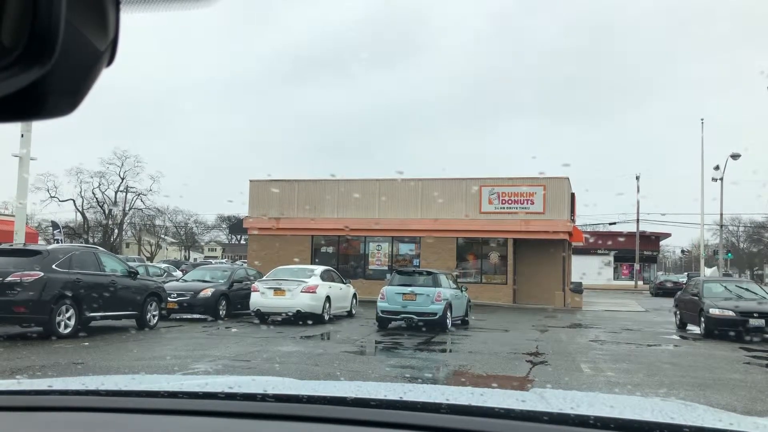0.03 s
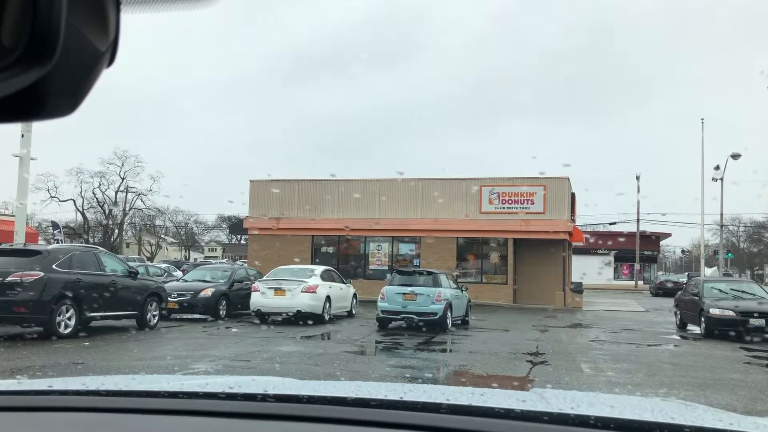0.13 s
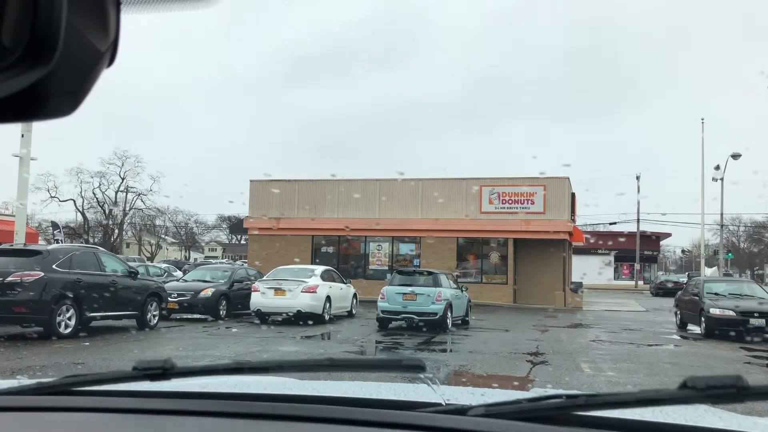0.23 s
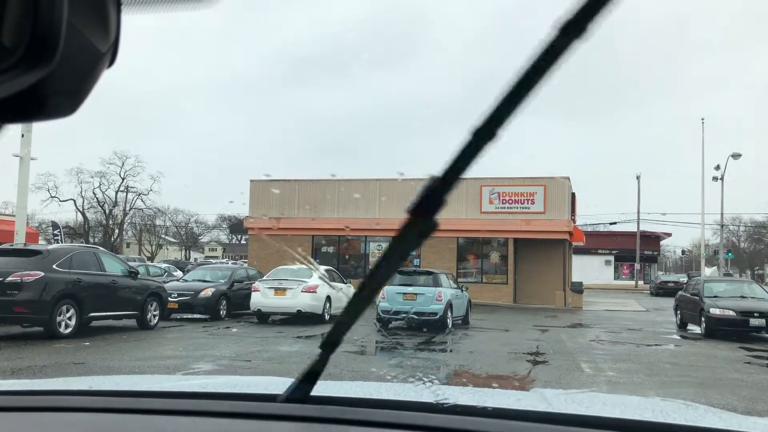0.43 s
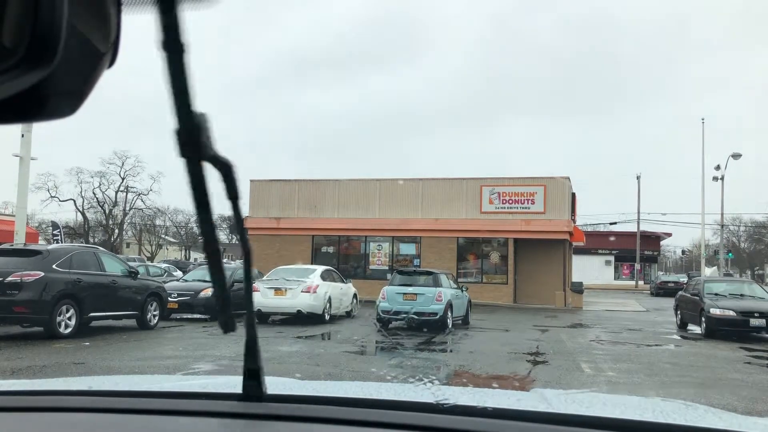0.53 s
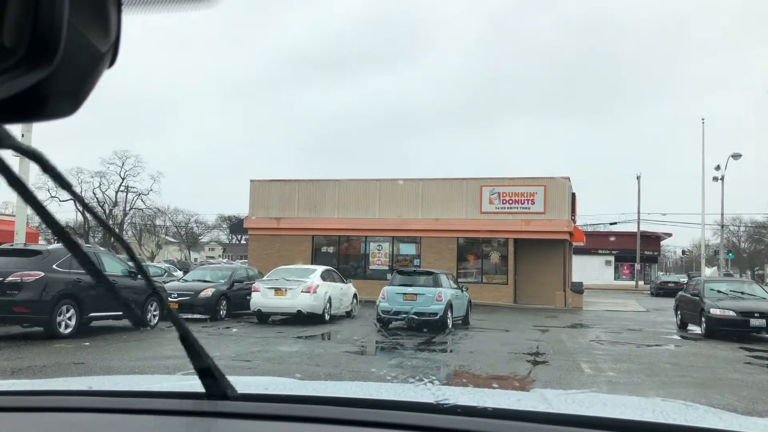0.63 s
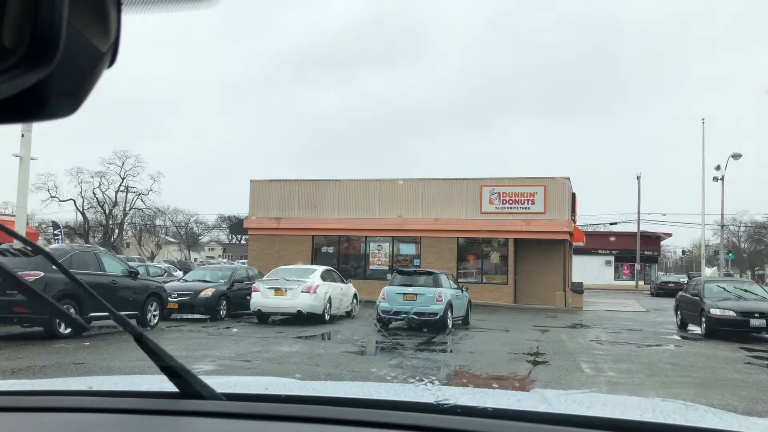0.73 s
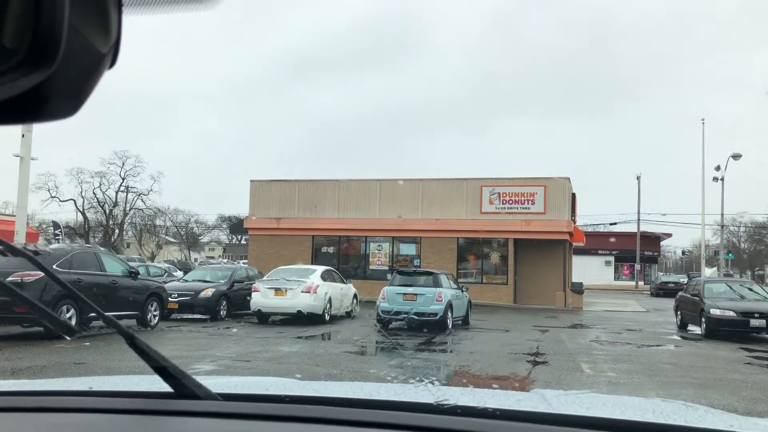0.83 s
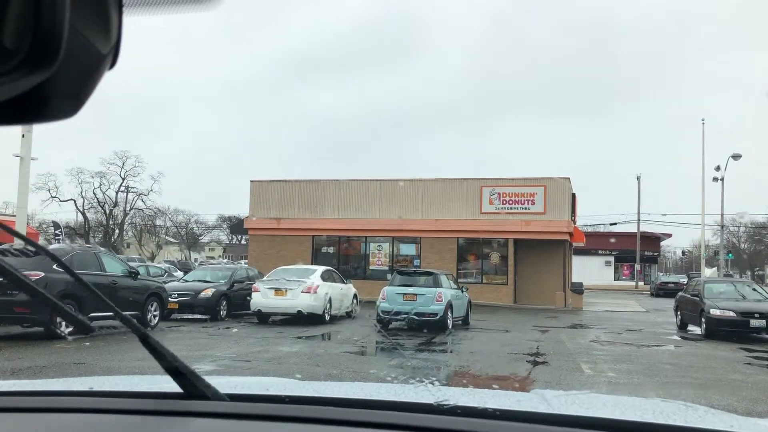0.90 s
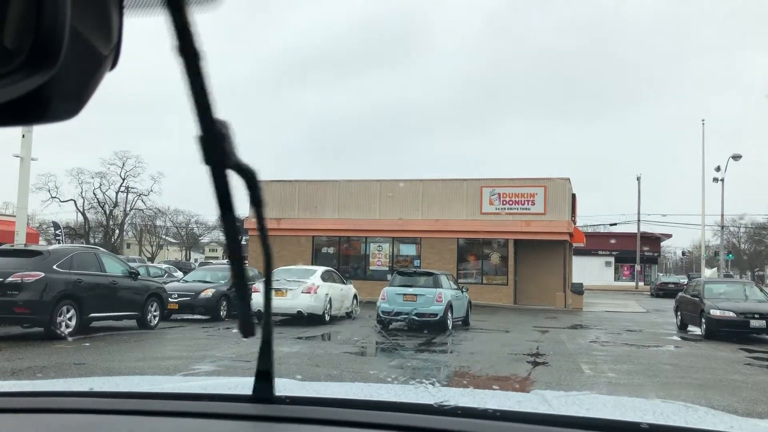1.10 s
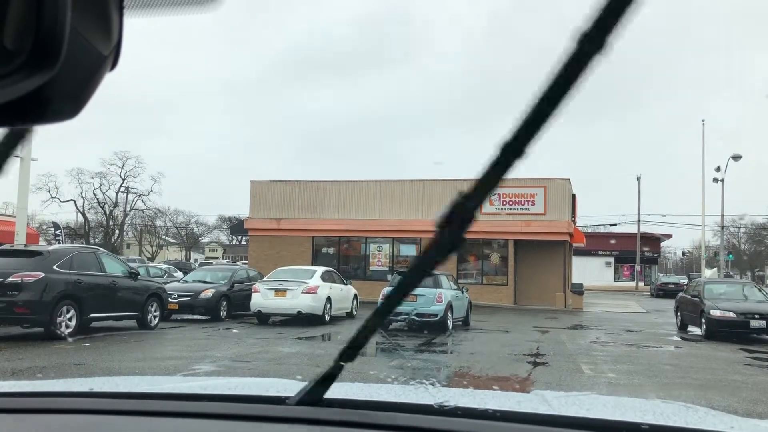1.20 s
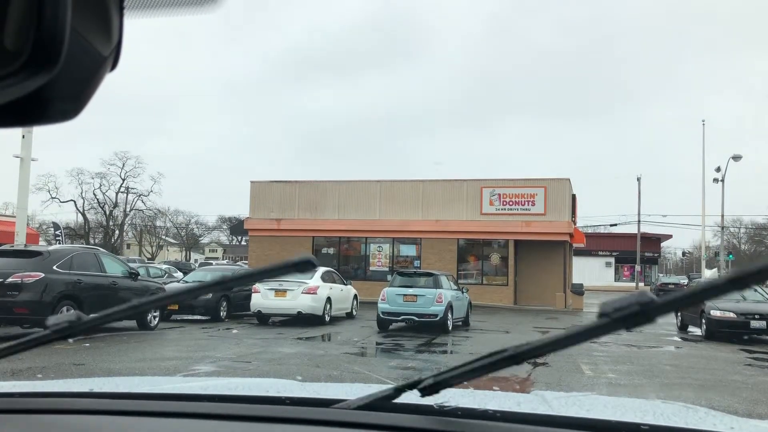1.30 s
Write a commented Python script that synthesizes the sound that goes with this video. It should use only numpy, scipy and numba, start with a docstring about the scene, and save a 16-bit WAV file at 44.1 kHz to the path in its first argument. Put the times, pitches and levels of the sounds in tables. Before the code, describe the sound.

Windshield wipers sweep once over wet glass, heard inside a car with a low idling engine. At about 0.2 seconds the wiper motor hums, the rubber snaps and the arms knock and thump. From 0.4 to 0.85 seconds the blades judder, a buzz with a falling ring. The arms clatter and thump at the turn until 1 second, then glide back quietly with a brief rub and last ticks around 1.2 seconds.

```python
"""Windshield wipers make one sweep over wet glass, heard inside an idling car.
Over the engine's low throb the wiper motor starts to hum, the wet rubber snaps, and the arms
knock in their joints and flex. On the way up the blades stick and slip about 100 times a second,
a buzzing judder with a falling ring. At the turn the arms clatter and thump, then the blades
glide back almost silently, with a brief humming rub and a few last ticks."""
import sys
import numpy as np
from scipy import signal
from scipy.fft import rfft, irfft
from scipy.io import wavfile
from scipy.ndimage import uniform_filter1d
from numba import njit

SR = 44100
rng = np.random.default_rng(int(sys.argv[2]) if len(sys.argv) > 2 else 0)


def dump_mix(stems):
    """Bounce the given channels to the path in sys.argv[1] as a 16-bit WAV at rate SR."""
    frames = np.atleast_2d(stems).T  # one column per channel
    limited = np.clip(frames, -1, 1)  # hard clip at full scale
    pcm = np.round(limited * 32767).astype(np.int16)
    wavfile.write(sys.argv[1], SR, pcm)


N = 59535
T = np.arange(N) / SR
# bright colour of water fizz and joint clicks (frequency [Hz], relative level [dB])
TICK_COLOUR = [(300, -41.5), (1200, 13.5), (2500, 3.5), (4000, 5), (6500, -2.5), (8500, -13.5),
               (11000, -19.5), (16000, -37.5)]


def amp(db):
    """Decibels to gain."""
    return 10 ** (np.asarray(db) / 20)


def unit(x):
    """Scales to rms 1."""
    return x / np.sqrt(np.mean(x ** 2) + 1e-20)


def add(mix, start_s, sound):
    """Mixes a sound in at a time."""
    part = mix[max(round(start_s * SR), 0):][:len(sound)]
    part += sound[:len(part)]


def colour(x, spectrum, size=8192):
    """Causal EQ of unit energy with the given spectrum."""
    points_hz, db = np.transpose(spectrum)
    hz = abs(np.fft.fftfreq(size, 1 / SR))
    log_gain = np.log(amp(np.interp(np.log(hz + 1), np.log(points_hz + 1), db)))
    minimum_phase = np.exp(np.conj(signal.hilbert(log_gain)))
    taps = np.fft.ifft(minimum_phase).real[:size // 2]
    return signal.fftconvolve(x, taps / np.linalg.norm(taps))[:len(x)]


def noise(spectrum, preroll=4096):
    """Steady coloured noise of rms 1."""
    return unit(colour(rng.standard_normal(N + preroll), spectrum)[preroll:])


def drift(hz):
    """Random wander of rms 1, mostly slower than hz."""
    f = np.fft.rfftfreq(N, 1 / SR)
    return unit(irfft(rfft(rng.standard_normal(N)) * np.exp(-(f / hz) ** 2), N))


def cycles(hz, waver, waver_hz):
    """Running cycle count of a wavering pitch."""
    return np.cumsum(hz * (1 + waver * drift(waver_hz))) / SR


def tone(turns, db):
    """A sine at an rms level, following a cycle count."""
    return np.sqrt(2) * amp(db) * np.sin(2 * np.pi * turns)


def decay(t60):
    """Envelope that falls 60 dB in t60 seconds."""
    return np.exp(-np.log(1000) * T / t60)


def burst(t60, size=14000):
    """A dying puff of noise with the energy of its envelope."""
    shape = decay(t60)[:size]
    return unit(rng.standard_normal(size) * shape) * np.sqrt(np.mean(shape ** 2))


def ringing(modes):
    """A struck object's dying modes."""
    return sum(amp(db) * decay(t60) * np.sin(2 * np.pi * hz * T) for hz, db, t60 in modes)


@njit
def smooth(x, keep):
    """One-pole low-pass whose speed may change."""
    y = x.copy()
    for i in range(1, len(x)):
        y[i] += keep[i] * (y[i - 1] - x[i])
    return y


def resonate(x, hz, width_hz):
    """A resonance of gain 1 that follows curves of pitch and width."""
    carrier = np.exp(2j * np.pi * np.cumsum(hz) / SR)
    return 2 * (carrier * smooth(x / carrier, np.exp(-np.pi * abs(width_hz) / SR))).real


def low_cut(x, hz):
    """Small parts radiate little bass."""
    return signal.lfilter(*signal.butter(2, hz, "highpass", fs=SR), x)


def roughen(clean, rough, share):
    """Blends two sounds by power."""
    return np.sqrt(1 - share) * unit(clean) + np.sqrt(share) * unit(rough)


def curves(table):
    """Each column of a table joined by straight lines in time."""
    times, *columns = np.transpose(table)
    return [np.interp(T, times, column) for column in columns]


def idle():
    """Wavering engine orders throb under the steady air of the cabin."""
    # engine orders (pitch [Hz], rms level [dB])
    orders = [(37.5, -50), (112, -64.5)]
    # dark cabin air (frequency [Hz], relative level [dB])
    cabin_colour = [(15, -22.5), (28, -5), (42, -2), (55, -0.5), (75, 1.5), (130, 2), (220, -8), (330, -12),
                    (500, -15.5), (900, -17.5), (1250, -19.5), (1600, -24.5), (2500, -29.5), (4000, -30.5),
                    (8000, -42), (16000, -54)]
    throb = np.zeros(N)
    for hz, db in orders:
        swaying_db = db + 2.5 * drift(6)
        throb += tone(cycles(hz, waver=.04, waver_hz=12), swaying_db)
    return throb + amp(-47.5) * noise(cabin_colour)


def motor():
    """The wiper motor hums under load while the blades swish over the glass."""
    # fader moves (time [s], hum level [dB], swish level [dB])
    faders = [(0, -62, -54), (.12, -75, -71), (.19, -43.5, -51), (.4, -38.5, -41.5), (.92, -37, -57.5),
              (1.03, -38, -47), (1.13, -52.5, -52.5), (1.25, -49.5, -57.5), (1.35, -49.5, -64)]
    # rubber gliding on glass (frequency [Hz], relative level [dB])
    swish_colour = [(100, 1), (330, 10), (600, -8.5), (1200, -20), (2200, -45), (4500, -32), (8000, -38),
                    (16000, -63)]
    hum_db, swish_db = curves(faders)
    turns = cycles(hz=117.37, waver=.0637, waver_hz=24.5)
    hum = tone(turns, hum_db + 5 * drift(33))
    return hum + amp(swish_db) * noise(swish_colour)


def snaps():
    """The wet rubber edge snaps: a bright tick, a slap on the glass and a faint cabin tail."""
    # snaps of the edge (time [s], level [dB])
    cues = [(0.1813, -47), (.2174, -44), (0.3005, -37), (.315, -36.5), (.41, -40.5), (0.485, -44.5),
            (0.5722, -45), (.630, -37.5), (.641, -42), (.652, -37), (0.709, -37.5), (.7208, -37),
            (.7596, -39.5), (0.779, -39), (1.2487, -40)]
    # their crisp top end (frequency [Hz], relative level [dB])
    snap_colour = [(300, -34.5), (1200, 4), (2500, -2), (4000, 1.5), (6500, 0), (8500, -11), (11000, -23),
                   (16000, -27)]
    ticks, slaps = np.zeros((2, N))
    for start, db in cues:
        tick = burst(t60=.0024)
        tail = amp(-18) * burst(t60=.073)
        add(ticks, start, amp(db) * (tick + tail))
        add(slaps, start, amp(db + 4) * burst(t60=.026))
    glass = resonate(slaps, hz=np.full(N, 1230), width_hz=np.full(N, 350))
    return colour(ticks, snap_colour) + glass


def knocks(size=14000):
    """Play in the joints: each knock rings the arm, rattles the blade frame on the glass and clicks."""
    # linkage knocks (time [s], arm ring [dB], clatter [dB], click [dB], clatter low-pass [Hz])
    cues = [(0.2124, -29, -36, -48.5, 4040), (0.2171, -23.5, -42.5, -39.5, 6000),
            (0.2216, -30, -39.5, -48.5, 4000), (0.2512, -35, -38, -49, 5970), (.276, -23, -37.5, -57, 1040),
            (0.3004, -24, -31, -42.5, 3980), (.3148, -32, -34.5, -46, 3870),
            (0.323, -24.5, -41, -46.5, 2000), (.388, -48, -45, -58.5, 1240),
            (0.4103, -30.5, -45, -55, 2000), (0.8454, -43, -29.5, -49, 4998),
            (.8484, -26.5, -33.5, -49, 3000), (.859, -33, -34, -46, 3000), (0.8607, -60, -40.5, -49, 3050),
            (.877, -28.5, -32.5, -48, 1470), (.953, -56, -39.5, -59, 800), (.962, -31, -42.5, -63, 500),
            (1.0103, -54, -50.5, -52, 6000), (1.015, -56, -46, -50, 5720), (1.096, -49, -47, -80, 610),
            (1.219, -44.5, -44, -51.5, 4040), (1.2206, -54, -48, -60, 4000)]
    # low ring of the arm (pitch [Hz], relative level [dB], t60 [s])
    arm_modes = [(94.4, -1, 0.072), (149.1, 5, 0.2), (178.5, 6, 0.076), (222.4, 1.5, 0.099),
                 (254.7, 3, 0.084), (332.4, -2, .13), (411.5, -12, 0.065)]
    # higher ring of the blade frame (pitch [Hz], relative level [dB], t60 [s])
    frame_modes = [(634, -7, 0.073), (1117, -8, 0.076), (1287, -13, 0.041), (1545, -13.5, 0.051),
                   (1690, -23, .05)]
    # blade clatter (frequency [Hz], relative level [dB])
    clatter_colour = [(100, -11.5), (250, 6.5), (420, 12.5), (500, 6), (620, 3.5), (780, 3.5), (950, -0.5),
                      (1130, -6.5), (1350, -4), (1650, -11.5), (2100, -23), (4000, -21), (16000, -74)]
    attack_s = .004
    arm = (1 - np.exp(-T / attack_s)) * ringing(arm_modes)
    frame = ringing(frame_modes)
    body, clicks = np.zeros((2, N))
    for start, ring_db, clatter_db, click_db, top_hz in cues:
        clatter = colour(burst(t60=.092), clatter_colour) + frame[:size]
        clatter = signal.lfilter(*signal.butter(2, top_hz, fs=SR), clatter)
        add(body, start, amp(ring_db) * arm[:size] + amp(clatter_db) * clatter)
        add(clicks, start, amp(click_db) * burst(t60=.038))
    return low_cut(body, hz=75) + colour(clicks, TICK_COLOUR)


def thumps_and_rub():
    """Low thumps of the flexing arms, and a brief humming rub of the blade on the way back."""
    # arm thumps, then the blade's rub in the last row
    # (time [s], pitch [Hz], level [dB], attack [s], t60 [s])
    cues = [(0.22, 99.7, -27, 0.021, 0.18), (0.289, 143.8, -13, .035, 0.14),
            (.292, 254, -28.5, 0.035, 0.056), (.845, 129.2, -21.5, 0.058, 0.075),
            (0.847, 81.5, -23.5, 0.05, .06), (0.967, 84.5, -23.5, 0.0143, 0.34),
            (0.964, 53.7, -25.5, 0.0054, 0.35), (0.974, 119.5, -26.5, 0.0033, 0.13),
            (1.085, 338.3, -39.5, 0.0083, 0.32)]
    mix = np.zeros(N)
    for start, hz, db, attack_s, t60 in cues:
        swell = np.minimum(T / attack_s, 1)
        release = np.exp(-np.log(1000) * np.maximum(T - attack_s, 0) / t60)
        add(mix, start, amp(db) * swell * release * np.sin(2 * np.pi * hz * T))
    return mix


def rubber_lip(slips, turns, scatter):
    """Each slip rings the rubber lip; past the upright, strong and weak kicks alternate."""
    # ring of the lip (time [s], pitch [Hz], first-stage width [Hz], level [dB], roughness [0-1])
    moves = [(.385, 680, 395, -47.5, 0.56), (.43, 584, 243, -44.5, 0.2), (.475, 583, 161, -31.5, 0),
             (.52, 483, 100, -49.5, 0.1), (.565, 406.5, 51.5, -35.5, 0.02), (.61, 367, 43.2, -39.5, 0.08),
             (.665, 401, 111.4, -31, 0.33), (.72, 353, 49.3, -30.5, 0), (.76, 347, 50, -30.5, .15),
             (.80, 343, 50.6, -34, 0), (.842, 345, 59.3, -30, 0.1)]
    hz, width_hz, db, roughness = curves(moves)
    limp_depth, upright_s = .93, .56
    limping = slips * (1 + limp_depth * (T > upright_s) * (-1) ** np.floor(turns))
    ring = roughen(limping, scatter, roughness)
    for widening in (1, 2, 2):
        ring = resonate(ring, hz, widening * width_hz)
    running_rms = np.sqrt(abs(uniform_filter1d(ring ** 2, size=2200)) + 1e-12)
    return low_cut(amp(db) * ring / running_rms, hz=193)


def judder():
    """The blade sticks and slips: once a cycle it swings, rings its lip, slaps the glass and sprays."""
    # stick-slip, levels before trims (time [s], slip rate [Hz], harmonics 1-4 [dB each],
    # glass slap [dB], water fizz [dB])
    moves = [(.385,94.5,-33,-40,-40.5,-56,-46.5,-61.5), (.412,107,-32.5,-37.5,-43.5,-71,-43.5,-74),
             (.44,108.5,-23,-28.5,-49.5,-38,-40,-57.5), (.472,115,-30.5,-26,-36,-36,-49.5,-71),
             (.502,102.7,-21,-38,-38,-35,-42,-59), (.53,97,-22.5,-34,-49,-48,-47.5,-59.5),
             (.562,98.4,-27.5,-43,-54,-30,-41.5,-62), (.605,90,-32,-40.5,-39,-29,-44.5,-78),
             (.64,95.7,-25,-35.5,-53.5,-38,-40,-69), (.668,101.8,-27,-37,-43,-23,-39,-58),
             (.69,103,-26.5,-44,-28,-48,-43,-62.5), (.718,107.4,-19,-36.5,-25.5,-28,-37,-60),
             (.765,101.3,-20.5,-31,-29,-34.5,-39.5,-54), (.805,104.5,-22.5,-46.5,-36,-34,-41,-89),
             (.842,109.7,-24.5,-31,-29,-48,-41,-55)]
    # harmonics 1-4 of the swing (trim [dB])
    trims = [0, 0, -1, -1]
    slap_trim_db, fizz_trim_db, slip_spread_db = 1.5, .5, 3
    fade_s, slap_t60, fizz_decay_cycles = .019, .055, .48
    slip_hz, *harmonics, slap_db, fizz_db = curves(moves)
    turns = cycles(slip_hz, waver=.008, waver_hz=90)
    swing = np.zeros(N)
    for k, db in enumerate(harmonics):
        flutter_db = .5 * k * drift(71)  # higher harmonics flutter more
        swing += tone((k + 1) * turns, db + trims[k] + flutter_db)

    slips = np.diff(np.floor(turns), prepend=0)  # one impulse a cycle
    slips *= amp(slip_spread_db * rng.standard_normal(N))
    scatter = signal.fftconvolve(slips, decay(slap_t60))[:N] * rng.standard_normal(N)
    lip = rubber_lip(slips, turns, scatter)

    # rubber slapping glass (frequency [Hz], relative level [dB])
    glass_colour = [(50, -43), (150, -22), (330, 1), (520, 5), (680, 1.5), (800, -5), (950, -8.5),
                    (1300, -7.5), (1650, -18.5), (2100, -45.5), (4000, -47), (16000, -65)]
    buzz = signal.fftconvolve(slips, burst(slap_t60))[:N]  # the same puff at every slip
    slap = colour(roughen(buzz, scatter, share=.35), glass_colour)
    slap = amp(slap_db + slap_trim_db) * unit(slap)
    spray = np.exp(-(turns % 1) / fizz_decay_cycles) * noise(TICK_COLOUR)
    fizz = amp(fizz_db + fizz_trim_db) * unit(spray)

    fade_in = np.clip((T - moves[0][0]) / fade_s + 1, 0, 1)
    fade_out = np.clip((moves[-1][0] - T) / fade_s + 1, 0, 1)
    return fade_in * fade_out * (swing + lip + slap + fizz)


def scene():
    """The mono mix, as heard from the front seat."""
    return (idle() + motor() + snaps() + knocks() + thumps_and_rub() + judder())[None]


def record(dry):
    """A steep low-pass trims the very top of the treble."""
    cutoff_hz = 16200
    taps = signal.firwin(511, cutoff_hz, window=("kaiser", 9), fs=SR)
    return signal.oaconvolve(dry, taps[None], "same")


dry = scene()
out = record(dry)
dump_mix(out)
```